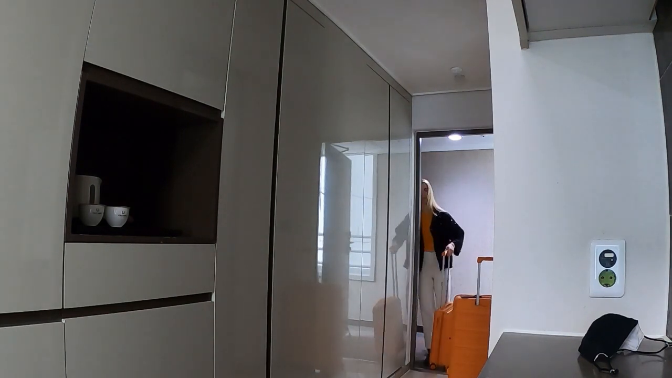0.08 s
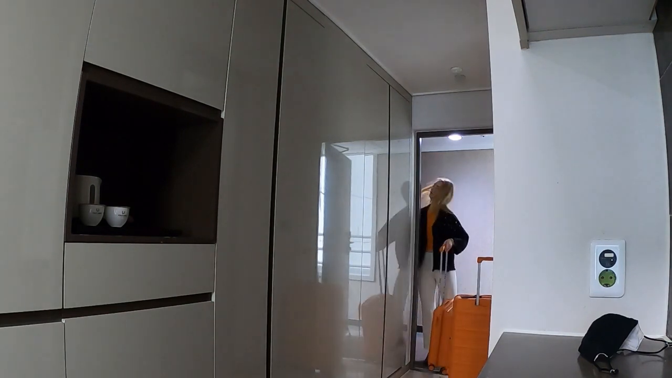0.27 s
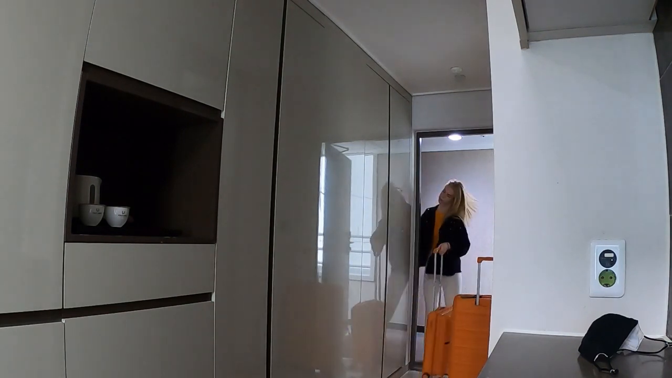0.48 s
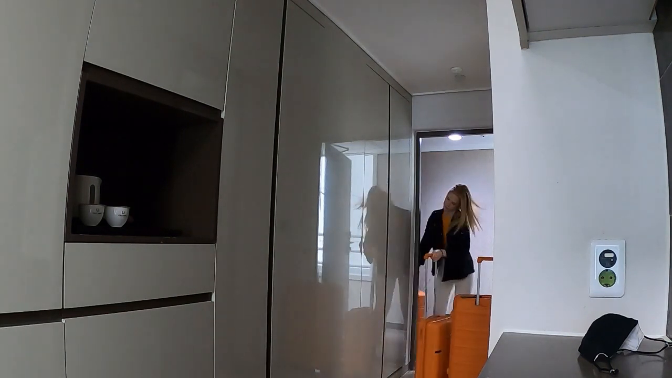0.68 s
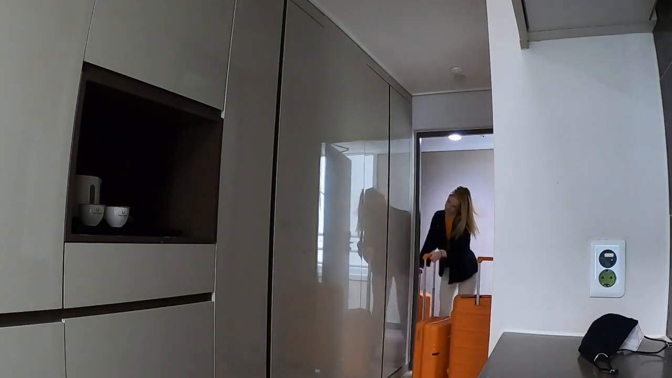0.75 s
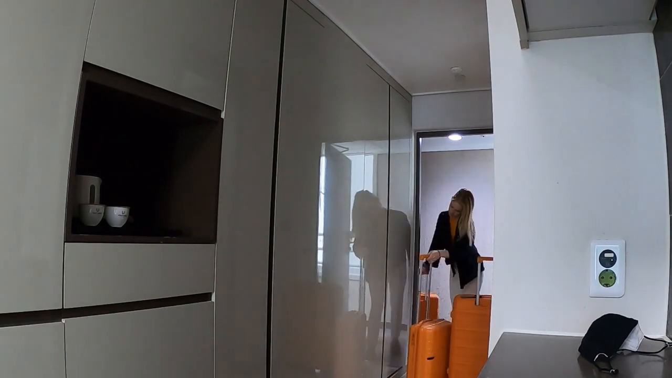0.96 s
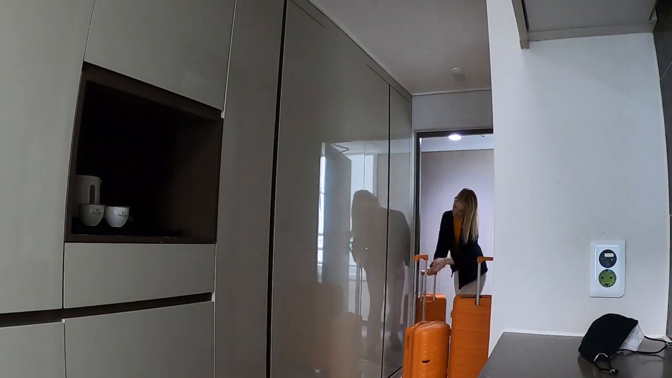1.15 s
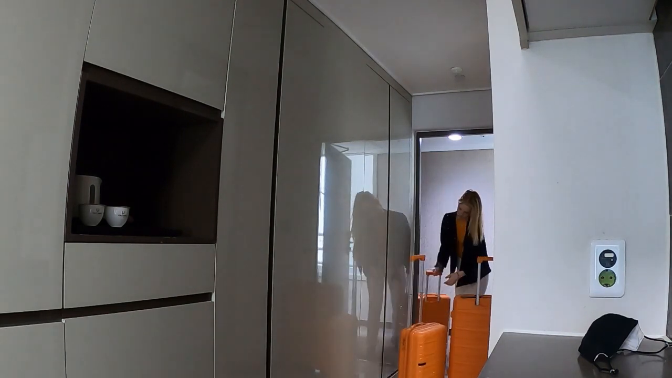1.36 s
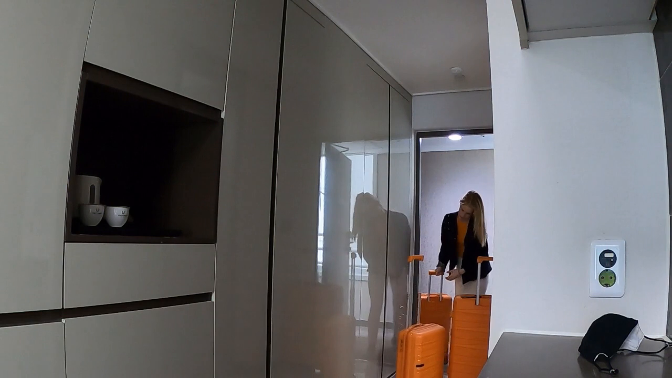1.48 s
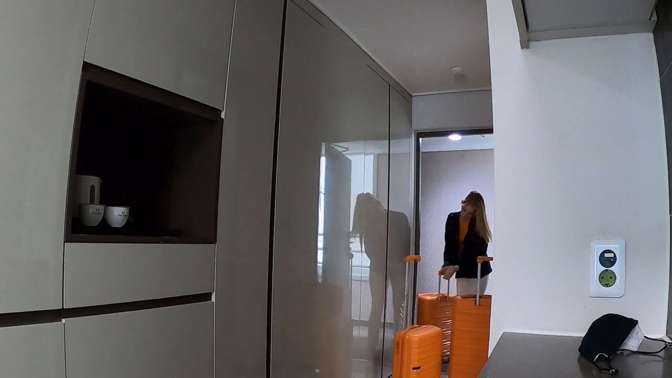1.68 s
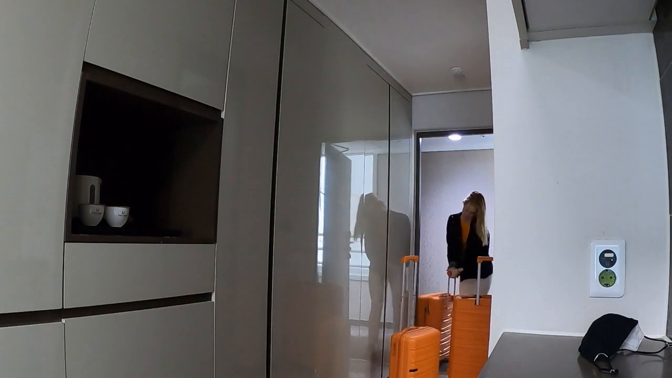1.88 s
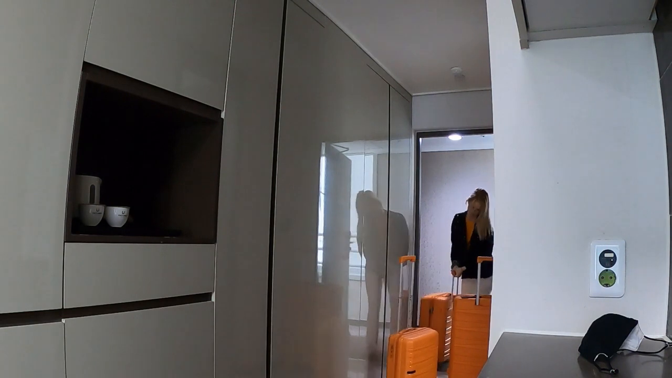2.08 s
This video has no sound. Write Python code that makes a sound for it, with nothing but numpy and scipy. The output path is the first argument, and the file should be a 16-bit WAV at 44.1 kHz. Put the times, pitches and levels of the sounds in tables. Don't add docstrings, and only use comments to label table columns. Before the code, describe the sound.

Hard-shell suitcases bump over a door sill: after a faint scuff, a loud hollow clatter of shell and wheels at 0.2-0.3 s, then a second cluster at 0.7-0.9 s with a thin rod jingle. A weak knock comes near 1.05 s. From 1.2 to 2.1 s, much quieter steps, scuffs, cloth rustles and ticks. Short lively room echo, faint stairwell tail, steady low hum, distant stereo microphone.

```python
import sys
import numpy as np
from scipy import signal
from scipy.fft import rfft, irfft
from scipy.io import wavfile

SR = 44100
rng = np.random.default_rng(int(sys.argv[2]) if len(sys.argv) > 2 else 0)


def digitize_waveform(pressure):
    field = np.atleast_2d(pressure).T
    bounded = np.clip(field, -1, 1)
    quanta = np.round(bounded * 32767).astype(np.int16)
    wavfile.write(sys.argv[1], SR, quanta)


def boost(x):
    u = np.asarray(x, float) / 20
    return 10 ** u


N = 92610

# start in seconds, then shell boom, panel knock,
# wheel-frame clack and bright tick, all in dB.
BANGS = [(.181, -84, -86, -52, -81), (0.189, -65, -52, -45.5, -68), (0.1999, -26, -21.5, -17, -28),
         (.212, -39, -14.5, -33, -33.5), (0.2234, -10, -12.5, -21, -35.5), (.232, -18.5, -19, -44, -32),
         (.243, -16.5, -25.5, -23, -36), (0.271, -27, -19, -16, -34.5), (0.2841, -12.5, -20, -25, -38),
         (.30, -30, -18.5, -29.5, -43), (0.684, -74, -31, -30.5, -36.5), (.691, -21.5, -23.5, -19, -29),
         (.701, -25.5, -23.5, -12, -47), (.711, -16, -17, -34, -41), (.718, -15.5, -23.5, -26, -45),
         (0.734, -33, -23, -18.5, -32.5), (0.794, -28.5, -38, -19.5, -52), (.804, -28.5, -19.5, -19, -40),
         (.816, -20.5, -20.5, -22.5, -27), (.852, -23, -29, -42, -33), (.890, -53, -32.5, -26, -57),
         (1.03, -41, -47, -44.5, -61.5), (1.058, -48, -40.5, -43, -62), (1.08, -48, -47.5, -52, -62)]
BIG, SMALL = BANGS[:10], BANGS[10:]
# start in seconds, then boom, knock, clack and tick in dB.
KNOCKS = [(0.151, -78, -83, -78, -96), (1.21, -56, -80, -75, -52), (1.272, -77, -52, -47, -48.5),
          (1.315, -57.5, -39, -54, -74), (1.334, -44.5, -39, -46, -80), (1.356, -38.5, -45, -57, -81),
          (1.375, -44, -48.5, -64, -81), (1.392, -43.5, -54, -60, -80), (1.438, -45, -81, -76, -97),
          (1.526, -45.5, -48, -68, -60.5), (1.555, -44, -53, -69, -87), (1.595, -52.5, -52.5, -75.5, -66),
          (1.641, -53, -51.5, -77, -66), (1.69, -46, -59, -75, -77), (1.706, -45.5, -47.5, -56, -39),
          (1.72, -50.5, -46.5, -61, -65), (1.817, -56, -66, -66, -58), (1.88, -44.5, -44, -49, -50.5),
          (1.898, -46.5, -49.5, -66, -65), (1.93, -46, -72, -62, -55), (2.007, -52, -60, -70, -69),
          (2.071, -52, -70, -56, -77)]
RUN_S = 0.008
LIGHT_DAMPING = 0.15


def rms_one(x):
    return x / np.sqrt(np.mean(x ** 2) + 1e-20)


def at_hz(points, hz):
    points = np.array(points)
    return np.interp(np.log(np.maximum(hz, 1)), np.log(np.maximum(points[:, 0], 1)), points[:, 1])


def lowpass(x, hz):
    return signal.sosfilt(signal.butter(2, hz, fs=SR, output="sos"), x)


def no_deep(x):
    return signal.sosfilt(signal.butter(3, 74, "high", fs=SR, output="sos"), x)


def drift(rate):
    r = np.exp(-80 * np.pi * rate / SR)
    slow = signal.lfilter([1], [1, -2 * r, r * r], rng.standard_normal(N // 40 + 2002))[2000:]
    return np.interp(np.arange(N) / 40, np.arange(len(slow)), rms_one(slow))


def bands(size, shape):
    # frequency in Hz, coherence from 0 to 1.
    coherence = [(30, .9), (130, .998), (350, .982), (700, .92), (1500, .84), (3000, .74), (6000, .2),
                 (12000, 0)]
    out, edges = 0, 22 * 2 ** np.arange(0, 9.8, 0.5)
    white = rng.standard_normal((2, 2, size))
    for k, (low, high) in enumerate(zip(edges, edges[1:])):
        band = signal.butter(2, [low, high], "band", fs=SR, output="sos")
        mid, side = signal.sosfilt(band, white[k % 2])
        hz = np.sqrt(low * high)
        alike = np.clip(at_hz(coherence, hz), 0, 1)
        stereo = np.sqrt(1 + alike) * mid + np.sqrt(1 - alike) * side * [[1], [-1]]
        out = out + shape(hz) * stereo
    return out


def ring(clicks, hz, t60):
    r = boost(-60 / (max(t60, 0.002) * SR))
    w = 2 * np.pi * hz / SR
    return signal.lfilter([0, np.sin(w)], [1, -2 * r * np.cos(w), r * r], clicks + 1e-18)


def contacts(rows, column, run_s, count):
    rows = np.array(rows)
    late = run_s * rng.exponential(1, (len(rows), count))
    blow_spread = 2.5 * rng.standard_normal((len(rows), 1))
    touch_spread = 3.0 * rng.standard_normal((len(rows), count))
    db = rows[:, [column]] + blow_spread + touch_spread
    touches = boost(db) * rng.choice([-1, 1], db.shape) / np.sqrt(count)
    index = np.minimum(((rows[:, [0]] + late) * SR).astype(int), N - 1)
    clicks = np.zeros(N)
    np.add.at(clicks, index, touches)
    return clicks


def body(rows, column, modes, run_s, count):
    return sum(boost(db) * ring(contacts(rows, column, run_s, count), hz, t60) for hz, db, t60 in modes)


def pushed(rows, modes):
    rows, pushes = np.array(rows), np.zeros(N)
    pushes[(rows[:, 0] * SR).astype(int)] = boost(rows[:, 1] - 8.0)
    return sum(boost(db) * ring(pushes, hz, t60) for hz, db, t60 in modes)


def hum():
    # frequency in Hz, level in dB.
    hum_spectrum = [(15, -42), (25, -9.5), (167, -2), (475, -7), (573, -24), (1210, -16), (2370, -29.5),
                    (8780, -46.5), (15000, -70)]
    return boost(-55.5) * rms_one(bands(N, lambda hz: boost(at_hz(hum_spectrum, hz) + 2.55 * drift(13.0))))


def room(x):
    # frequency in Hz, t60 in seconds.
    room_t60 = [(60, 0.35), (200, 0.28), (500, 0.42), (1200, 0.39), (3000, 0.38), (7000, 0.4),
                (13000, 0.43)]
    # frequency in Hz, t60 in seconds.
    hall_t60 = [(150, 1.5), (700, 1.61), (1300, 1.05), (2000, 0.58), (6000, 0.28)]
    t = np.arange(int(1.5 * SR)) / SR

    def fade(hz):
        return boost(-60 * t / at_hz(room_t60, hz)) + boost(-21 - 60 * t / at_hz(hall_t60, hz))

    build_s = 0.00033
    echoes = bands(len(t), fade) * (1 - np.exp(-t / build_s))
    echoes = boost(1) * echoes / np.sqrt(np.sum(echoes ** 2) / 2)
    return signal.fftconvolve(x[None], echoes, axes=1)[:, :N]


def brushing(rows, spectrum, grain_db):
    t = np.arange(N) / SR
    swell = 0
    for start, rise, fall, db in rows:
        rising = np.exp(-((t - start) / rise) ** 2)
        falling = np.exp(-np.maximum(t - start, 0) / fall)
        swell = swell + boost(db) * np.where(t < start, rising, falling)
    together = drift(60)

    def grain(hz):
        return boost(at_hz(spectrum, hz) + grain_db * together + 2.0 * drift(23)) * (hz > 700)

    return swell * rms_one(bands(N, grain))


def scuffs():
    # peak time, rise and fall in seconds, level in dB.
    strokes = [
        (0.024, 0.014, 0.047, -60),
        (1.05, 0.05, 0.061, -63),
        (1.236, 0.13, 0.042, -62),
        (1.33, 0.067, 0.022, -75),
        (1.42, 0.019, 0.12, -70.5),
        (1.6, 0.029, 0.12, -78),
        (2.082, 0.28, 0.07, -65.5),
    ]
    # frequency in Hz, density in dB per Hz.
    spectrum = [(900, -17), (1800, 0), (4000, -4), (8000, -11.5), (13000, -22)]
    return brushing(strokes, spectrum, grain_db=1.5)


def rustles():
    # peak time, rise and fall in seconds, level in dB.
    strokes = [
        (1.225, 0.078, 0.046, -62),
        (1.274, .003, .04, -65),
        (1.933, .003, 0.018, -69),
    ]
    # frequency in Hz, density in dB per Hz.
    spectrum = [(2500, -15), (5000, 3), (9000, -8), (12000, -6), (14500, -16)]
    return brushing(strokes, spectrum, grain_db=1.0)


def pull_rod():
    # start in seconds, level in dB.
    hits = [
        (.728, -47),
        (.81, -56),
        (.846, -46),
        (.88, -52),
    ]
    # frequency in Hz, level in dB, t60 in seconds.
    modes = [(7920, -17, .12), (13530, -17, .16)]
    return body(hits, 1, modes, RUN_S, count=6)


def rattle(rows, spectrum, run_s):
    colour = boost(at_hz(spectrum, np.fft.rfftfreq(N, 1 / SR)) + 18.0)
    return irfft(rfft(contacts(rows, 4, run_s, count=60)) * colour, N)


def bright_ticks():
    # frequency in Hz, density in dB per Hz.
    bump_spectrum = [(3000, -20.5), (4500, -4), (6000, -8.5), (9000, -5), (11000, -26.5), (14000, -48),
                     (16000, -70.5)]
    # frequency in Hz, density in dB per Hz.
    light_spectrum = [(3000, -26), (4500, -2.5), (6000, -11), (8500, -1), (11000, -12), (14000, -51),
                      (16000, -76)]
    return rattle(BANGS, bump_spectrum, 0.9 * RUN_S) + boost(-1.5) * rattle(KNOCKS, light_spectrum, 0.61 * RUN_S)


def wheel_frames():
    # frequency in Hz, level in dB, t60 in seconds.
    big_modes = [(2220, -10.5, 0.008), (2300, -6.5, 0.0037), (2890, -4, 0.015), (3090, -1, 0.0057),
                 (3500, 1.5, 0.0039), (3520, -5, 0.013), (4300, -23, 0.0035), (5580, -7, 0.0035)]
    # frequency in Hz, level in dB, t60 in seconds.
    small_modes = [(1790, -4, 0.0026), (2120, -5, 0.0096), (2350, -3, 0.0047), (2810, 0, 0.011),
                   (3240, 1.5, 0.012), (3650, 2.5, 0.0055), (4260, -19, 0.0029), (5580, -8.5, 0.0035)]
    light_modes = np.multiply(big_modes, [1, 1, LIGHT_DAMPING])
    big = body(BIG, 3, big_modes, RUN_S, count=60)
    small = body(SMALL, 3, small_modes, RUN_S, count=60)
    light = boost(7.5) * body(KNOCKS, 3, light_modes, 1.2 * RUN_S, count=60)
    return boost(-4.0) * (big + small + light)


def panels():
    # frequency in Hz, level in dB, t60 in seconds.
    big_modes = [(540, 0, 0.03), (650, -4, 0.023), (878, 0, 0.015), (969, 1, 0.019), (1230, -2, 0.011),
                 (1416, 0.5, 0.01), (1600, -8, 0.0094), (1996, -10, 0.014)]
    # frequency in Hz, level in dB, t60 in seconds.
    small_modes = [(500, -0.5, 0.02), (661, 0, 0.02), (940, -8.5, 0.043), (997, -4.5, 0.031),
                   (1114, 0.5, 0.022), (1356, -0.5, 0.014), (1650, -2.5, 0.011)]
    light_modes = np.multiply(big_modes, [1, 1, LIGHT_DAMPING])
    big = body(BIG, 2, big_modes, 1.2 * RUN_S, count=30)
    small = body(SMALL, 2, small_modes, 1.1 * RUN_S, count=30)
    light = boost(5.5) * body(KNOCKS, 2, light_modes, 1.3 * RUN_S, count=30)
    return boost(-4) * (big + small + light)


def bracket_clacks():
    # start in seconds, frequency in Hz, level in dB.
    hits = [(.2012, 3730, -17), (0.2049, 3650, -19), (0.2058, 1350, -14.5), (.213, 3500, -15),
            (.234, 3420, -14.5), (.258, 2800, -25), (.2715, 2830, -12), (.301, 2800, -16.5),
            (0.7013, 2540, -7), (.706, 3860, -15), (.713, 3650, -27), (0.8048, 2890, -11),
            (0.807, 4900, -22), (0.811, 3120, -13.5), (.818, 3500, -18.5), (1.2143, 5450, -47),
            (1.2722, 4980, -43), (1.722, 3900, -49.5)]
    hard = sum(boost(db) * ring(signal.unit_impulse(N, int(s * SR)), hz, 0.0097) for s, hz, db in hits)
    return lowpass(hard, 3960)


def corner_thuds():
    # start in seconds, frequency in Hz, level in dB, t60 in seconds.
    hits = [(.204, 330, -19.5, 0.044), (.2225, 830, -17, 0.02), (0.227, 350, -8, 0.019),
            (.2435, 290, -16, 0.017), (.252, 330, -19, 0.029), (.2845, 191, -17.5, 0.036),
            (.292, 290, -23, 0.1), (.311, 860, -25, .03), (.704, 540, -18.5, 0.041),
            (0.7109, 263, -19.5, 0.069), (.722, 1045, -21, 0.068), (.806, 1090, -27, 0.048),
            (.81, 655, -21, 0.081), (.826, 874, -25, 0.05), (1.061, 605, -33.5, 0.017),
            (1.711, 301, -43.5, 0.018), (1.728, 250, -45, 0.038), (1.895, 1430, -43, .03)]
    hollow = sum(boost(db) * ring(signal.unit_impulse(N, int(s * SR)), hz, t60) for s, hz, db, t60 in hits)
    return no_deep(lowpass(hollow, 1700))


def boom(ring_share):
    # frequency in Hz, level in dB, t60 in seconds.
    big_modes = [(82.2, -47, 0.11), (109, -26, 0.264), (143, -8, 0.36), (195.2, 3, 0.252),
                 (290, -0.5, 0.36), (341.4, 5.5, 0.1), (387.7, -5, .12), (402, 2.5, 0.21),
                 (433, -2.5, 0.095), (498, -13.5, 0.16)]
    # frequency in Hz, level in dB, t60 in seconds.
    small_modes = [(78, -32, 0.2), (122, -24, 0.16), (156, -10.5, .2), (196.8, 3, 0.22),
                   (258.6, -2.5, 0.18), (322, -2.5, 0.1), (422.9, -5.5, 0.24), (540, -13, 0.046)]
    # frequency in Hz, level in dB, t60 in seconds.
    floor_modes = [(58, -5, 0.23), (130, 1, 0.077), (149.6, 2, 0.35), (196.3, 0, 0.17), (272.2, -4, 0.15),
                   (309, -2.5, 0.11), (357, -4.5, 0.065), (423, -5.5, 0.1)]
    low = 0
    for rows, modes in [(BIG, big_modes), (SMALL, small_modes), (KNOCKS, floor_modes)]:
        low = low + pushed(rows, np.multiply(modes, [1, 1, ring_share]))
    return no_deep(lowpass(low, 650))


def scene():
    clatter = panels() + wheel_frames() + bright_ticks() + pull_rod()
    single = bracket_clacks() + corner_thuds()
    wet = room(clatter + boost(-7.5) * single + boost(-0.5) * boom(0.41))
    direct = boom(0.95) + boost(1) * clatter + single
    return direct + wet + scuffs() + rustles() + hum()


def band_limit(x):
    return signal.sosfilt(signal.butter(12, 15600, fs=SR, output="sos"), x)


def record(dry):
    # frequency in Hz, left minus right in dB.
    lean = [(60, 0), (240, -0.8), (950, -0.2), (3770, 1), (8000, -2.5), (15000, -6.5)]
    hz = np.fft.rfftfreq(N, 1 / SR)
    lag = np.exp(-0.5j * 1 * np.tanh(hz / 3000))
    half = boost(at_hz(lean, hz) / 2) * lag
    x = irfft(rfft(dry) * [half, 1 / half], N)
    x = signal.sosfilt(signal.cheby2(10, 60, 15900, fs=SR, output="sos"), x)
    x = signal.sosfilt(signal.butter(2, [30, 10450], "band", fs=SR, output="sos"), x)
    return band_limit(x)


dry = scene()
out = record(dry)
digitize_waveform(out)
```